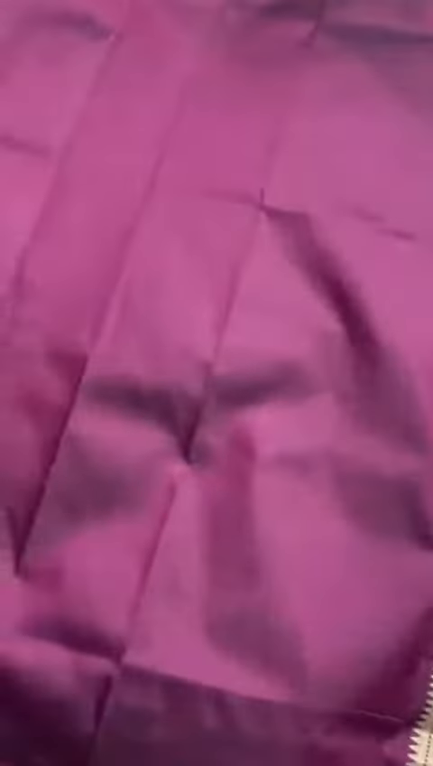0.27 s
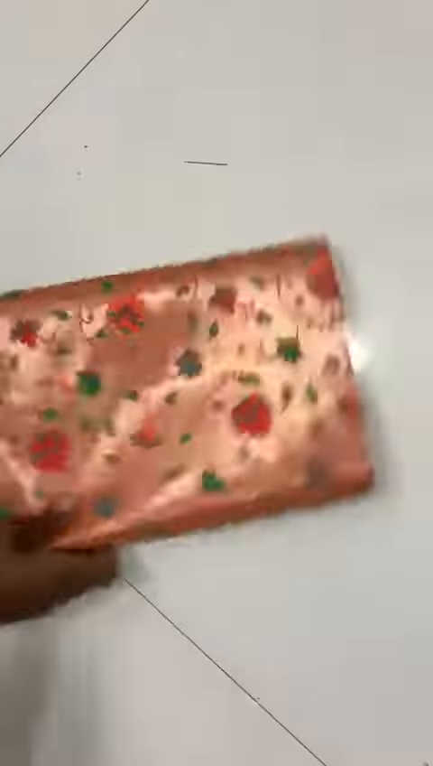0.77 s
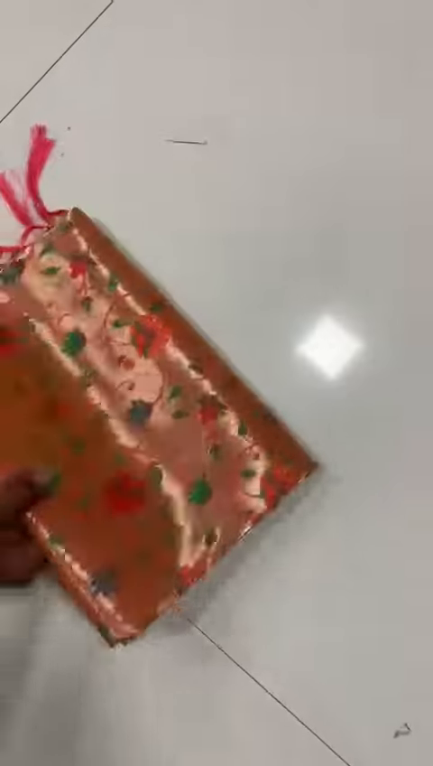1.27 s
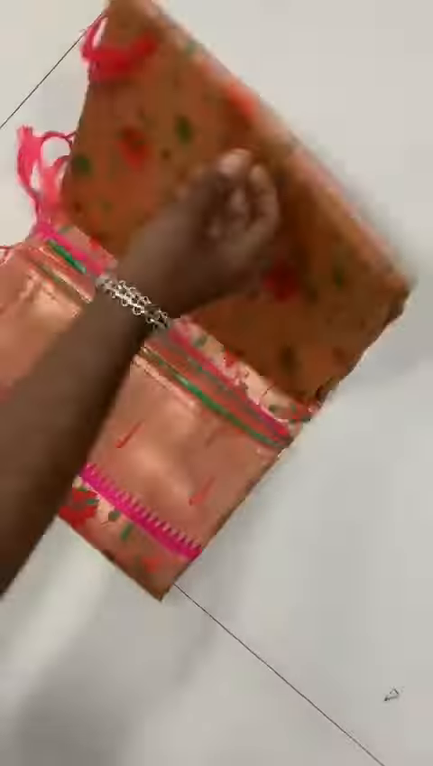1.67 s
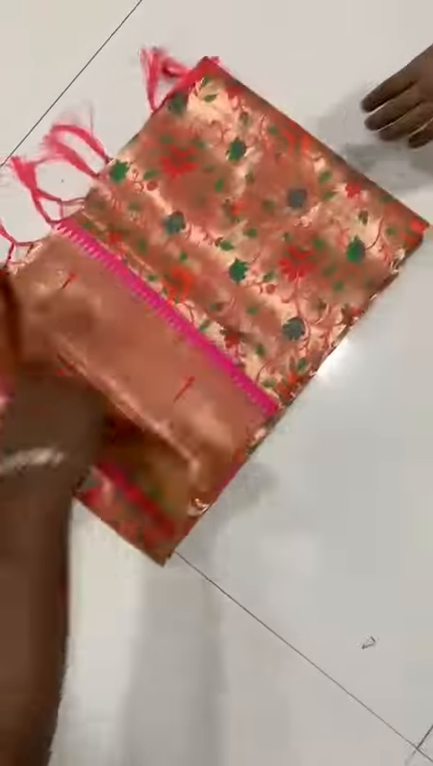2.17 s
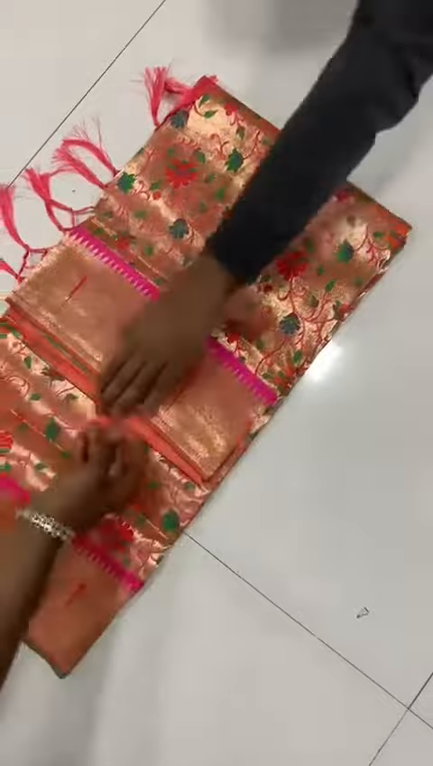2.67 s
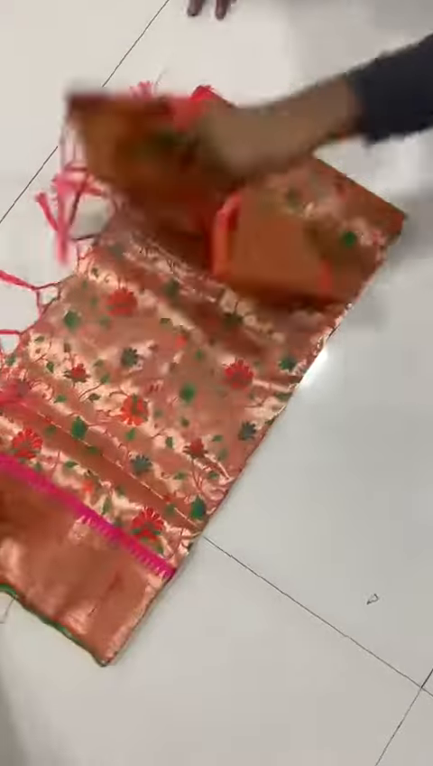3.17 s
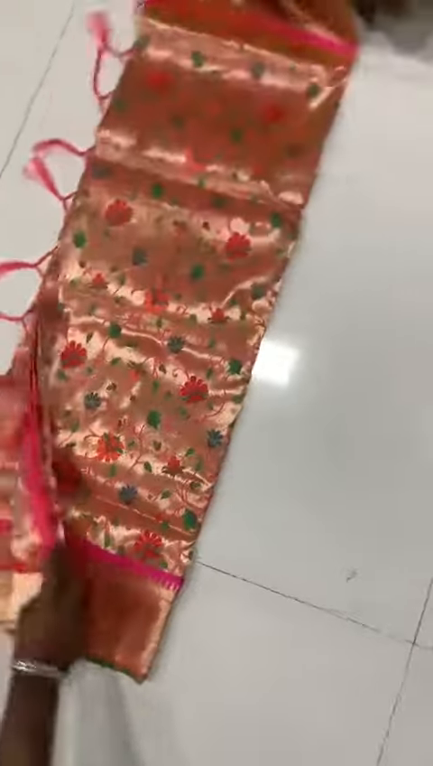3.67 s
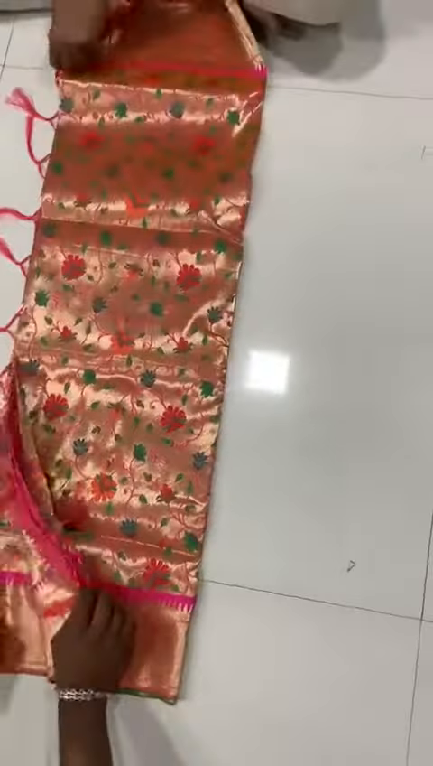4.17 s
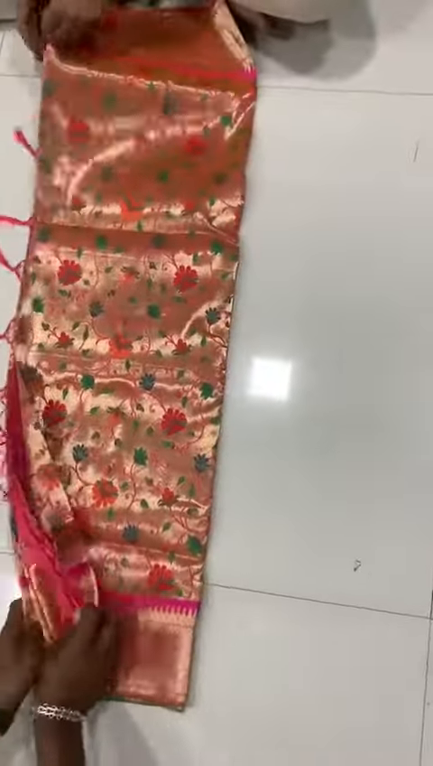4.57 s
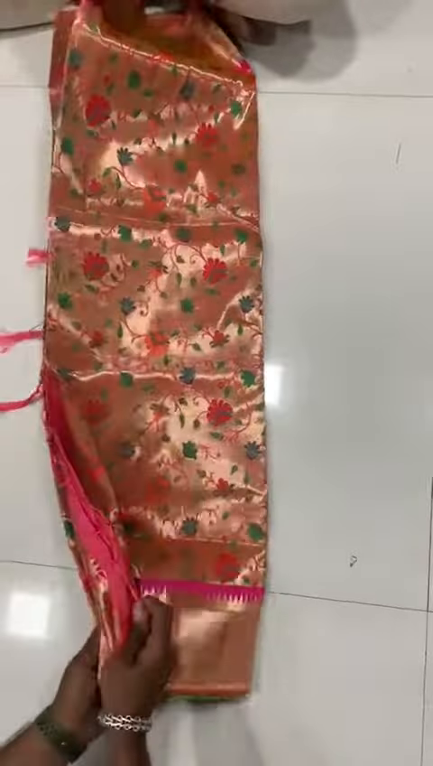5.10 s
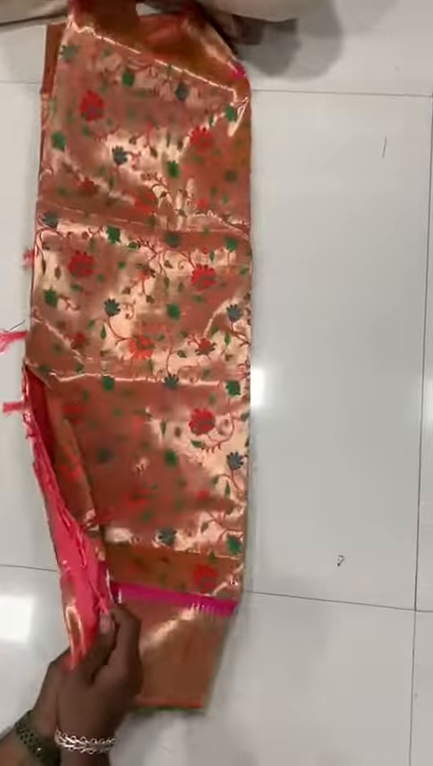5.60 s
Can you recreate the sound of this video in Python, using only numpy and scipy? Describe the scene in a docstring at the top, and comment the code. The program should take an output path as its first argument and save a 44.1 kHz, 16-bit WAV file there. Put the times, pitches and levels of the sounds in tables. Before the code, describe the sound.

For the first 0.37 s there is only low airy noise, faint hum and a thin high hiss, cut by a moment of near silence. At 0.42 s close cloth handling begins, with two soft pats near 0.6 s and light silky rustle. A very sharp crease snap cracks at 1.08 s; a cluster of crisp ticks runs from 1.23 to 1.55 s with dull rubbing and thick rustles. At 1.87 s a fold swishes open and flops with the strongest pat. Smaller rustles and ticks follow, with a short flap near 2.47 s. After quieter sliding, a crackling run of snaps and a gritty swish come at 3.53-3.67 s, with a soft landing. A low muffled thump falls at 3.96 s. Then faint rustling, a crisp snap at 4.92 s, a snapping swish around 5.22 s and a small tick at 5.72 s. Short hard-room echoes and low rumble continue throughout the handling.

```python
"""A stiff silk saree is unfolded and spread on a tiled floor, close to a phone with two microphone ports.
The weave rustles in tiny slips and popping wrinkles, creases snap with a tick and a falling bending wave,
folds swish open in gritty bursts and layers land with soft pats of trapped air.
The small hard room answers with echoes and a short tail, over low rumble and a wavering hum.
At first there is only hum and air with a thin high hiss, which ends in a moment of near silence."""
import sys
import numpy as np
from scipy import signal
from scipy.fft import rfft, irfft, next_fast_len
from scipy.io import wavfile
from scipy.ndimage import uniform_filter1d, map_coordinates

SR = 44100
rng = np.random.default_rng(int(sys.argv[2]) if len(sys.argv) > 2 else 0)


def wav_out(sig):
    """Save sig, one row per channel (or a flat mono array), as 16-bit PCM at SR to the path in sys.argv[1]."""
    wavfile.write(sys.argv[1], SR, np.round(np.clip(np.atleast_2d(sig).T, -1, 1) * 32767).astype(np.int16))


N = 257544
T = np.arange(N) / SR  # time [s]

# Levels in the tables are relative: each source adds its own trim.
# strokes of cloth over cloth:
# (fastest moment [s], half length [s], dry rustle [dB], extra sheen of the fine threads [dB])
STROKES = [(0.43, 0.028, -64.5, 11), (0.574, 0.028, -59.5, 7.5), (0.89, 0.071, -65, 8),
           (1.397, 0.044, -50.5, -6), (1.57, 0.048, -51.5, -0.5), (1.738, 0.033, -47.5, -6.5),
           (2.056, 0.024, -51.5, -16), (2.38, 0.045, -50, -4.5), (2.757, .016, -63, 5),
           (2.886, 0.028, -50, -10), (2.958, 0.014, -52.5, -24), (3.116, 0.017, -60.5, -7.5),
           (3.173, 0.011, -52, -14), (3.338, 0.27, -65, 6.5), (3.82, 0.045, -57, -10),
           (3.985, 0.016, -60, 7.5), (4.238, .015, -74.5, 17.5), (4.323, 0.032, -68.5, 18),
           (4.392, 0.01, -51.5, -21), (4.63, 0.052, -62, 4), (4.73, 0.048, -65, 3.5),
           (5.114, 0.022, -57.5, -5), (5.31, 0.045, -57, -6)]
# dull rubbing, strongest while the thick bundle is turned over: (time [s], level [dB])
RUBBING_LEVEL = [(.45, -60.5), (.66, -53.5), (1.2, -58), (1.62, -45.5), (2.2, -60), (2.65, -57.5),
                 (3.45, -56), (3.72, -72), (3.95, -55.5), (4.2, -57.5), (5.84, -60)]
# folds swinging open: (fastest moment [s], half length [s], level [dB], treble corner [Hz])
FOLD_SWISHES = [(1.879, 0.015, -38, 4100), (2.471, 0.0069, -49, 11000), (3.587, 0.031, -43, 10100),
                (4.935, 0.0079, -55.5, 11000), (5.233, 0.016, -44, 8860)]
# creases snapping: (time [s], crisp level [dB], hollow body level [dB], crackle length [s],
# ring pitch [Hz], treble corner [Hz])
CREASE_SNAPS = [(0.93, -30, -47, 0.0006, 1910, 5800), (1.0797, -9, -34.5, 0.00035, 2870, 9800),
                (1.226, -30, -54, 0.0015, 6760, 9000), (1.241, -26.5, -59.5, 0.00025, 3570, 5930),
                (1.249, -45, -46.5, .0005, 4200, 5000), (1.2766, -20.5, -47, 0.00077, 2330, 6000),
                (1.3374, -20, -69, 0.00047, 3320, 3120), (1.365, -30, -49, 0.00077, 4070, 9900),
                (1.4033, -17, -35.5, 0.00076, 4460, 6460), (1.4382, -14.5, -38.5, 0.0015, 4230, 7660),
                (1.4402, -15.5, -36.5, 0.00066, 2600, 6000), (1.4892, -6.5, -43, 0.00037, 1670, 13200),
                (1.546, -24, -39, 0.00062, 1730, 6000), (1.862, -28, -44, 0.0025, 4000, 6030),
                (1.8692, -12.5, -33, 0.0038, 1690, 6360), (2.3932, -23.5, -41.5, 0.0013, 3300, 5900),
                (2.418, -36, -46, 0.001, 3500, 7000), (2.467, -27.5, -41, 0.0017, 6000, 12200),
                (2.583, -39, -47.5, .0015, 1300, 3000), (2.6613, -29, -46, 0.0012, 1640, 7700),
                (2.67, -31, -60, 0.0012, 3800, 6000), (2.749, -41, -65, 0.0024, 4730, 7040),
                (3.309, -39.5, -70, 0.0024, 7300, 11000), (3.5343, -24, -58, 0.0011, 3740, 9200),
                (3.551, -23, -53, 0.0034, 1780, 7000), (3.5675, -17.5, -48, 0.0012, 2250, 9000),
                (3.5826, -17, -40, 0.0005, 1700, 9300), (3.5983, -21, -40, 0.0008, 6600, 10000),
                (3.6078, -18.5, -41, 0.0005, 2000, 9000), (3.616, -25, -52, .0008, 3300, 8000),
                (3.6695, -29, -61, 0.0015, 3300, 6000), (4.268, -31, -63, 0.0014, 2600, 9850),
                (4.669, -39, -62, .0015, 2000, 4000), (4.732, -37, -64, 0.0028, 3080, 6000),
                (4.836, -37, -50.5, .0015, 1700, 4500), (4.9182, -20, -44.5, 0.00028, 5870, 13000),
                (5.2112, -16.5, -38, 0.0006, 6140, 13500), (5.2181, -19.5, -52, 0.0007, 4000, 7000),
                (5.2206, -26, -41, .0012, 2060, 8000), (5.229, -20, -49, 0.0013, 4300, 8000),
                (5.243, -23.5, -69, 0.0018, 3700, 7100), (5.718, -32.5, -65, 0.0014, 1770, 5700)]
# cloth and hand landing on the floor: (time [s], level [dB], decay [s], pitch of the trapped air [Hz])
FLOOR_PATS = [(0.558, -40, 0.02, 246.5), (0.596, -40.5, 0.014, 168), (1.406, -45, 0.024, 419),
              (1.471, -37, 0.012, 273), (1.879, -20, 0.0035, 510), (1.886, -28, 0.0086, 241),
              (1.8945, -33, 0.01, 166), (1.907, -47, 0.008, 560), (2.368, -47, 0.0062, 242),
              (2.475, -36.5, 0.014, 424), (2.486, -42, 0.011, 233), (3.188, -51, 0.021, 242),
              (3.621, -31.5, 0.013, 443), (3.63, -38, 0.025, 57), (3.667, -41, 0.0068, 79.5),
              (3.96, -38.5, 0.092, 165.7), (5.431, -51.5, 0.084, 392)]

# Spectra, overall power set to 1 when used: (frequency [Hz], relative power per Hz [dB])
WEAVE_SPECTRUM = [(200, -10.5), (600, -1.5), (1200, 4), (1900, 5.5), (3000, 1.5), (4300, 0), (6500, -10.5),
                  (8200, -20), (11600, -48)]  # rustling weave
SHEEN_SPECTRUM = [(2000, 8.5), (4500, 2.5), (6500, 3.5), (8200, -1), (10000, -17.5), (11600, -8),
                  (13000, -50)]  # fine threads
RUB_SPECTRUM = [(100, -10.5), (230, -2), (500, 2.5), (900, -1), (1500, -3.5), (3000, -24.5)]  # dull rubbing
FLAP_SPECTRUM = [(200, -1), (600, -0.5), (1400, 0.5), (2200, 1), (3200, -2.5), (4300, 1.5), (6300, 0),
                 (8200, -2), (10000, -10), (11600, -4), (13000, -39)]  # opening fold
CREASE_SPECTRUM = [(200, -22), (700, -10), (1800, 3), (3400, -0.5), (5000, 0.5), (6800, -2), (8300, -5.5),
                   (10000, 1), (11600, -11.5), (14000, -41)]  # crisp part of a snap
HOLLOW_SPECTRUM = [(120, -22), (300, 10.5), (550, 8), (1000, 10), (2000, 6.5), (4000, -61)]  # hollow body of a snap
PAD_SPECTRUM = [(35, -2.5), (90, 0.5), (160, -1), (235, -6.5), (310, -11.5), (420, 2), (540, -11),
                (700, -12), (1500, -9)]  # air puffed out by a landing
RUMBLE_SPECTRUM = [(20, -9.5), (45, 0), (70, -0.5), (100, 5), (135, -4.5), (200, -10), (300, -14),
                   (450, -15.5), (750, -38), (1200, -39.5), (3000, -39), (6500, -38.5), (12000, -74.5)]  # room after the opening
OPENING_SPECTRUM = [(22, -25), (50, 6.5), (90, 4.5), (250, -6), (500, -7), (1100, -14), (2000, -22.5),
                    (2900, -24.5), (3800, -27), (5100, -30.5), (6300, -27.5), (6800, -14), (7350, -12),
                    (7600, -28), (7950, -62), (9500, -43.5)]  # air and high hiss of the first moments

# standing waves of the room: (pitch [Hz], 60 dB decay [s], level against the tail [dB])
ROOM_MODES = [(152, .25, -26), (238, .25, -24), (535, .4, -24), (837, .35, -25), (982, .25, -25)]
# first reflections off the floor and the nearest walls: (delay [s], level against the tail [dB])
FIRST_ECHOES = [(.0034, -9), (0.0106, -10), (0.0164, -17)]
# the two microphone ports, before the bass is centred:
# (frequency [Hz], phase lead of the left [rad], likeness [0-1])
PORT_PHASE = [(60, 2, 0.97), (130, -1.5, 1), (190, -2.5, 0.86), (407, -2.5, 0.92), (600, -2.5, 1),
              (1584, -4.5, 0), (1870, -4.5, 0), (2680, -3, 0.75), (3730, -5, 0.99), (5210, -3, 0.89),
              (5970, -1.35, 0.45), (6300, 1.9, 1), (7580, 0.5, 1), (9260, 3, 1), (10580, 3, 1),
              (11640, 7.5, 0.63)]
# corner below which the bass is centred; it sinks after an early rise: (time [s], corner [Hz])
CENTRED_BASS = [(.38, 583), (.42, 1200), (1.75, 1170), (2.3, 615), (3.0, 316), (3.6, 183), (4.0, 140)]

SILENCE_START, SILENCE_END = 0.372, 0.418  # [s]
STROKE_RELEASE, SWISH_RELEASE = 0.96, 1  # decay time [half lengths]
# held cloth stirs between strokes, a little less as it comes to lie flat
HELD_DB, HELD_DB_PER_S, HELD_SHEEN_DB = -63.5, -0.82, 0
FIDGET_DB, FIDGET_HZ = 2, 16  # wandering of the held cloth
DRAG_DB = -6.5  # dull rubbing that comes with any dry rustle
# in every snap: crackle and rebound against the tick, then the crinkling after it [dB] and its decay [s]
CRACKLE, REBOUND, SETTLE_DB, SETTLE_S = 0.7, 0.2, -17, 0.009
CLOTH_ROOM_DB, SNAP_ROOM_DB = -2.5, -11.5  # room reply
HUM_HZ, HUM_DB = 91, -61.5  # centre of the wavering hum
TOP_HZ = 12900  # upper limit of the microphone sound


def cloth(rustle_db=-2.0, rub_db=-3, sheen_db=-7.0, jerk_db=1.5):
    """Sliding silk: dry slips and popping wrinkles of the weave, the hiss of fine threads and dull rubbing."""
    held = undb(HELD_DB + HELD_DB_PER_S * T + FIDGET_DB * walk(FIDGET_HZ))
    dry_power = held ** 2
    bright_power = (held * undb(HELD_SHEEN_DB)) ** 2
    for at, half, db, extra_sheen_db in STROKES:
        stroke = undb(db) * swell(at, half, STROKE_RELEASE)
        dry_power += stroke ** 2
        bright_power += (stroke * undb(extra_sheen_db)) ** 2
    dry_level, bright_level = np.sqrt(dry_power), np.sqrt(bright_power)
    bundle_level = undb(np.interp(T, *np.transpose(RUBBING_LEVEL)))
    dull_level = np.hypot(bundle_level, undb(DRAG_DB) * dry_level)

    wrinkles = crinkles(rate=380, spread_db=2.2, low_hz=900, high_hz=5000, cycles=3)
    weave = slips(rate=600, spread_db=1.5, smooth=0.69) + 0.8 * wrinkles
    rustle = unit(colour(weave, WEAVE_SPECTRUM)) * undb(rustle_db) * dry_level
    threads = slips(rate=2500, spread_db=3.0, smooth=1.0)
    sheen = colour(threads, SHEEN_SPECTRUM) * undb(sheen_db) * bright_level
    rubbing = slips(rate=980, spread_db=2.0, smooth=0.69)
    rub = colour(rubbing, RUB_SPECTRUM) * undb(rub_db) * dull_level

    # the cloth never glides evenly, it moves in small jerks
    jerky = (rustle + sheen) * undb(jerk_db * walk(140))
    sliding = patchy(jerky, depth_db=4.5, rate=30) + patchy(rub, depth_db=3)
    return sliding * (T > SILENCE_END)


def flaps(flap_db=1, grit_db=4.5):
    """A fold swings open: a dense, gritty burst of slips and popping wrinkles, duller where the cloth lies thick."""
    wrinkles = crinkles(rate=700, spread_db=2.5, low_hz=900, high_hz=8000, cycles=2.5)
    texture = slips(rate=800, spread_db=1.4, smooth=0.25) + wrinkles
    grit = unit(undb(grit_db * walk(300)))
    crackle = unit(colour(texture, FLAP_SPECTRUM)) * grit
    out = np.zeros((2, N))
    for at, half, db, top_hz in FOLD_SWISHES:
        burst = crackle * swell(at, half, SWISH_RELEASE)
        out += undb(db + flap_db) * soften(burst, top_hz)
    return out


def snaps(body_decay=0.0022, crisp_db=-1.0, ring_q=1.9, ring_db=4.0,
          bend_hz=520, sweep_hz=2200, sweep_s=0.001143, flutter=0.94):
    """A buckling crease ticks, rebounds, rings and crinkles; its bending wave falls, low notes travelling slowest."""
    ticks, bends = np.zeros((2, N)), np.zeros((2, N))
    age = np.arange(2048) / SR
    falling_hz = bend_hz + sweep_hz * np.exp(-age / sweep_s)
    bend = np.sqrt(2) * np.sin(2 * np.pi * np.cumsum(falling_hz) / SR)
    shared_only = np.array([[1], [0]])
    sheet = colour(noise(), HOLLOW_SPECTRUM)
    wrinkles = crinkles(rate=1800, spread_db=2, low_hz=1000, high_hz=9000, cycles=1.5)
    for at, db, body_db, length, hz, top_hz in CREASE_SNAPS:
        start = int(at * SR)
        span = slice(start, start + len(age))
        crackle_shape = np.exp(-age / length) * (1 - np.exp(-age / length))
        burst = CRACKLE * unit_energy(rng.standard_normal((2, len(age))) * crackle_shape)
        burst[0, 0] += 1  # the tick
        burst += REBOUND * np.roll(burst, round(SR / hz), axis=1)
        burst += undb(ring_db) * signal.lfilter(*signal.iirpeak(hz, ring_q, SR), burst)
        burst += undb(SETTLE_DB) * unit_energy(wrinkles[:, span] * np.exp(-age / SETTLE_S))
        ticks[:, span] += undb(db + crisp_db) * soften(burst, top_hz)
        body_shape = 2 * np.sqrt(age / body_decay) * np.exp(-age / body_decay)
        bends[:, span] += undb(body_db) * body_shape * (bend * shared_only + flutter * sheet[:, span])
    return colour(ticks, CREASE_SPECTRUM) + bends


def pats(ring=0.62, puff_share=0.43, reach=1.83, depth=3.23):
    """Folded layers flop down: the trapped air rings briefly and escapes in a dull puff."""
    out, air = np.zeros((2, N)), colour(noise(), PAD_SPECTRUM)
    for at, db, decay, hz in FLOOR_PATS:
        band = signal.butter(2, [hz / depth, hz * reach], "bandpass", fs=SR, output="sos")
        shape = fade(at, decay)
        puff = signal.sosfilt(band, air * shape + 1e-18)
        puff = unit_energy(puff) * np.sqrt(np.sum(shape ** 2))
        out += undb(db) * puff_share * puff
        tone = np.sqrt(2) * np.sin(2 * np.pi * hz * (T - at))
        out[0] += undb(db) * ring * shape * tone
    return out


def background(tone_db=-50.0, opening_db=-47.0):
    """Low rumble with a wavering motor hum; the first moments have their own air and a thin high hiss."""
    wavering_hz = HUM_HZ + 0.8 * walk(3)
    hum = np.sqrt(2) * np.sin(2 * np.pi * np.cumsum(wavering_hz) / SR)
    hum *= undb(HUM_DB + 2 * walk(3))
    rumble = colour(noise(), RUMBLE_SPECTRUM) * undb(tone_db) * (T > SILENCE_END)
    opening = colour(noise(), OPENING_SPECTRUM) * undb(opening_db + 1.5 * walk(26))
    opening *= T < SILENCE_START
    return patchy(rumble + opening, depth_db=2.0) + np.stack([hum, np.zeros(N)])


def room(x, wet_db, t60=0.22, gap=0.0027):
    """Tiles and bare walls return a few echoes, then a short dense tail in which standing waves linger."""
    age = T[:SR // 2]
    tail = unit_energy(noise()[:, :len(age)] * undb(-60 * age / t60) * (age > gap))
    for hz, ring, db in ROOM_MODES:
        wave = np.sin(2 * np.pi * hz * age) * undb(-60 * age / ring)
        tail[0] += undb(db) * wave / np.sqrt(np.sum(wave ** 2))
    for delay, db in FIRST_ECHOES:
        tail[0, int(delay * SR)] += undb(db)
    return x + signal.fftconvolve(x[:1], undb(wet_db) * tail, axes=1)[:, :N]


def ports(x):
    """Turn shared (row 0) and differing (row 1) sound into two ports whose phase gap depends on frequency."""
    hz, lead, likeness = np.transpose(PORT_PHASE)
    f, t, (shared, apart) = signal.stft(x, SR, nperseg=512, noverlap=384)
    f = f[:, None] + 1
    corner_hz = np.interp(t, *np.transpose(CENTRED_BASS))
    wide = 1 / (1 + (corner_hz / f) ** 8)  # near 0 in the centred bass
    alike = 1 - wide * (1 - np.clip(np.interp(f, hz, likeness), 0, 1))
    turn = np.exp(0.5j * wide * np.interp(f, hz, lead))
    shared = shared * np.sqrt((1 + alike) / 2)
    apart = apart * np.sqrt((1 - alike) / 2)
    pair = np.stack([(shared + apart) * turn, (shared - apart) / turn])
    return signal.istft(pair, SR, nperseg=512, noverlap=384)[1][:, :N]


def slips(rate, spread_db, smooth):
    """Threads catching and letting go: sparse clicks of very uneven size over a smooth hiss; rate per second."""
    sizes = undb(spread_db * np.minimum(rng.exponential(size=N), 5))
    clicks = noise() * sizes * (rng.random(N) < rate / SR)
    return unit(unit(clicks) + smooth * noise())


def crinkles(rate, spread_db, low_hz, high_hz, cycles):
    """Tiny wrinkles pop at random, each ringing for a few cycles at a pitch of its own; rate per second."""
    when, pitch, size, left, right = rng.random((int(rate * N / SR), 5)).T[..., None]
    hz = low_hz * (min(high_hz, 0.45 * SR) / low_hz) ** pitch
    age = T[:384]
    grains = np.sqrt(hz) * np.sin(2 * np.pi * hz * age) * np.exp(-age * hz / cycles)
    grains *= undb(spread_db * np.minimum(-np.log(1 - size), 3.5))
    place = ((when * N).astype(int) + np.arange(len(age))).ravel()
    rows = []
    for side in (left, right):  # each row draws its own signs
        signed = grains * np.sign(side - 0.5)
        rows.append(np.bincount(place, signed.ravel())[:N])
    return unit(np.stack(rows))


def patchy(x, depth_db, rate=22, grain_hz=260):
    """Colour flickers in small random patches of pitch and time, as moving folds favour pitches of their own."""
    f, t, frames = signal.stft(x, SR, nperseg=512)
    field = rng.standard_normal((256, 512))
    spots = np.meshgrid(f / grain_hz, t * rate, indexing="ij")
    gain = undb(depth_db * map_coordinates(field, spots, order=1, mode="wrap"))
    return signal.istft(frames * unit(gain), SR)[1][..., :N]


def swell(at, half, release):
    """A movement gathers speed along a bell curve and dies away exponentially; release is in half lengths."""
    u = (T - at) / half
    drop = np.where(u < 0, u ** 2 / 2, (np.hypot(u, 1) - 1) / release)
    return np.exp(-np.minimum(drop, 50))


def fade(start, decay):
    """Sudden start, exponential decay."""
    age = T - start
    return (age >= 0) * np.exp(-np.clip(age / decay, 0, 50))


def walk(rate):
    """Random wandering of roughly unit spread: straight lines between rate random points per second."""
    knots = rng.standard_normal(4096)
    return np.interp(T * rate, np.arange(len(knots)), knots)


def colour(x, points):
    """Causal minimum-phase filter with the given spectrum; white noise keeps its power."""
    hz, db = np.transpose(points)
    size = 2 * next_fast_len(N // 2 + 8192)
    f = np.maximum(np.arange(size // 2 + 1) * SR / size, 1)
    gain_db = np.interp(np.log(f), np.log(hz), db)
    # steep slopes beyond both ends of the table
    gain_db -= 40 * np.log10(np.maximum(f / hz[-1], 1) * np.maximum(hz[0] / f, 1))
    cepstrum = irfft(np.log(unit(undb(gain_db)) + 1e-6))
    cepstrum[1:size // 2] *= 2
    cepstrum[size // 2 + 1:] = 0
    return irfft(rfft(x, size) * np.exp(rfft(cepstrum)))[..., :N]


def soften(x, hz):
    """Roll off the treble above a corner."""
    low_pass = signal.butter(2, min(hz, 0.45 * SR), fs=SR, output="sos")
    return signal.sosfilt(low_pass, x + 1e-18)


def noise():
    """Two unrelated white noises."""
    return rng.standard_normal((2, N))


def undb(db):
    """Decibels to gain."""
    return 10 ** (np.asarray(db) / 20)


def unit(x):
    """Scale to rms 1."""
    return x / np.sqrt(np.mean(x ** 2))


def unit_energy(x):
    """Scale each row to energy 1."""
    return x / np.sqrt(np.sum(x ** 2, axis=1, keepdims=True))


def scene():
    """Cloth, folds, pats and snaps in the room, over its hum, reach the two ports."""
    moving = room(cloth() + flaps() + pats(), wet_db=CLOTH_ROOM_DB)
    snapping = room(snaps(), wet_db=SNAP_ROOM_DB)
    return ports(moving + snapping + background())


def record(dry):
    """The sound drops out briefly, and the top is cut."""
    dropped = (T > SILENCE_START) & (T < SILENCE_END)
    gain = uniform_filter1d(np.where(dropped, undb(-28), 1.0), 64)
    top_cut = signal.ellip(8, 0.2, 70, TOP_HZ, fs=SR, output="sos")
    return signal.sosfilt(top_cut, dry * gain)


dry = scene()
out = record(dry)
wav_out(out)
```